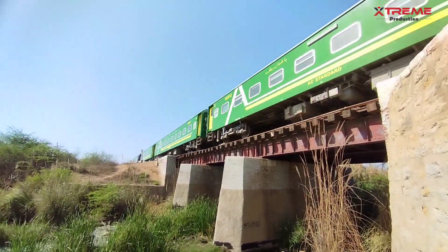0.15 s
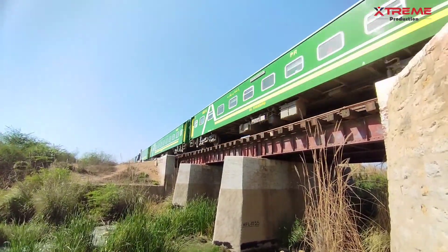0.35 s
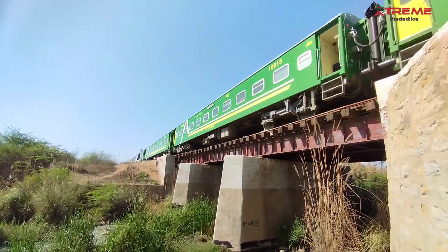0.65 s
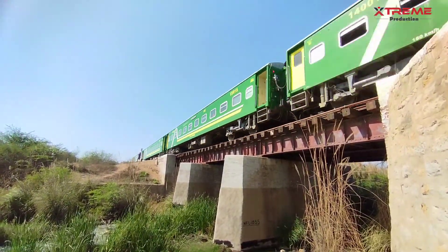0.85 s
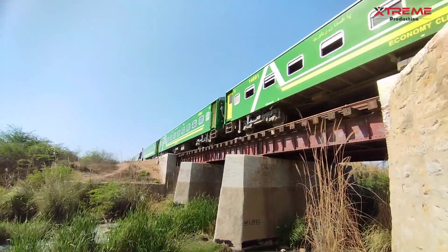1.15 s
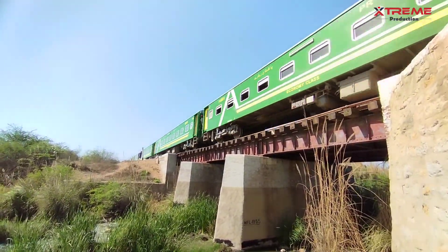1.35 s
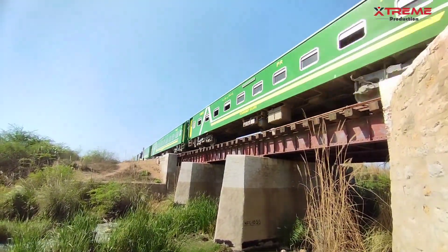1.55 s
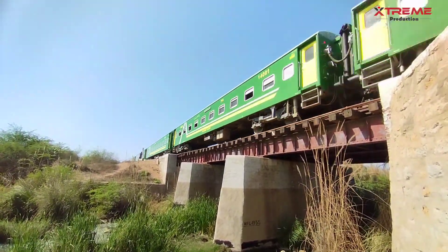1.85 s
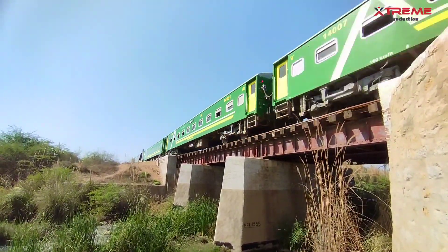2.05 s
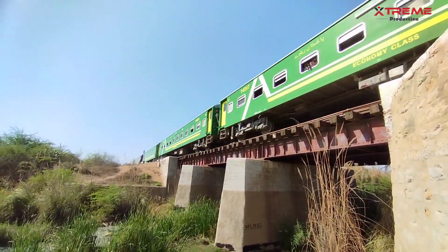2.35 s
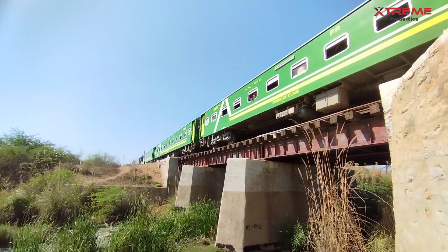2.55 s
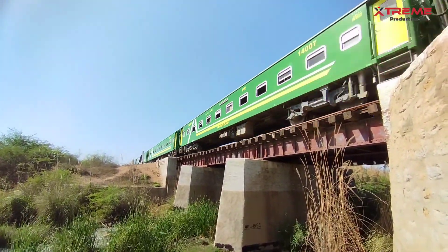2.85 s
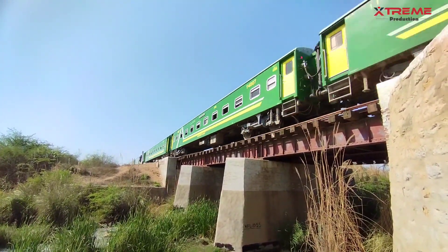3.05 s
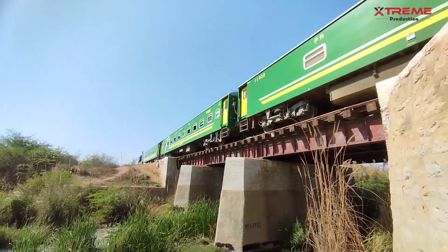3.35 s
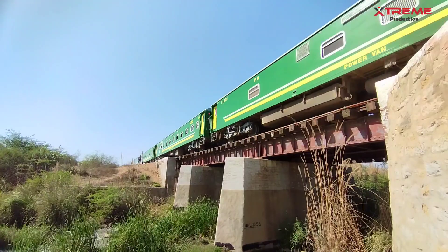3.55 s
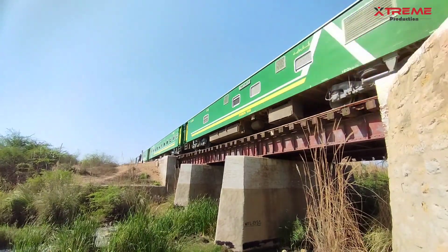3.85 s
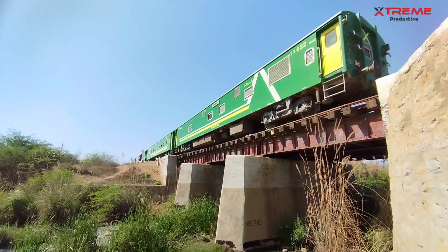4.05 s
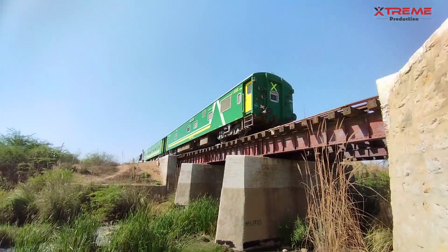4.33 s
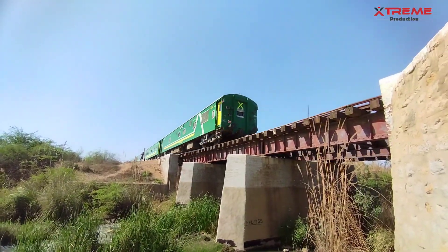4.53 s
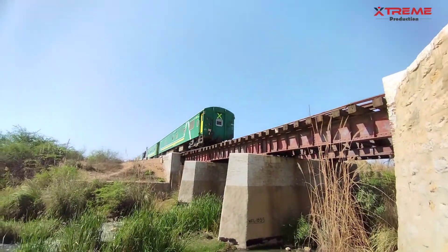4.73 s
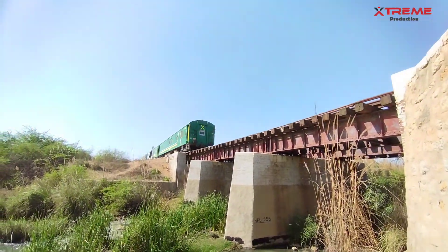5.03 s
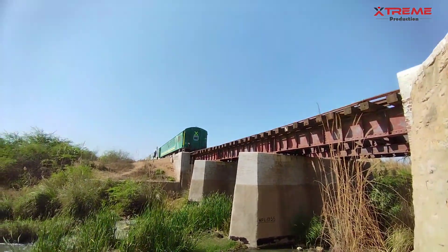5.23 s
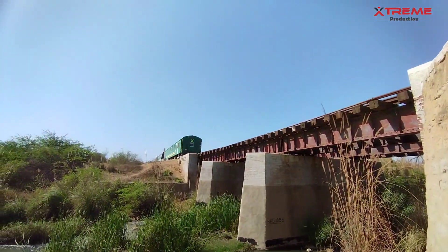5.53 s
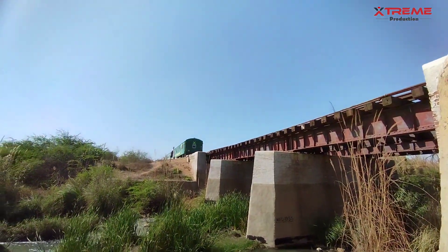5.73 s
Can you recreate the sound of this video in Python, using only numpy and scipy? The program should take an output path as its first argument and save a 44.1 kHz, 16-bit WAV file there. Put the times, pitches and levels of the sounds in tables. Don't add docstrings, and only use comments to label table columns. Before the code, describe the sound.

A passenger train is already crossing a steel girder bridge at full speed, heard outdoors from close below in wide stereo with peaks held down. From 0 to 4.2 s the girder plates give a dense, hollow low roar around a deep span boom, mostly below 450 Hz. About eight or nine knocks a second fall in uneven clusters, the pattern repeating roughly every 1.1 s: dull hard clacks, short wheel-rim pings, chattering loose iron and soft puffs of hiss. Around 4.25 s the wheel noise briefly dips; the last wheels pass at about 4.4-4.6 s with a ringing metallic rush. The train then recedes: the upper plate roar thins while deep throbbing remains. Sparse clanks follow, with a hard cluster near 5.23 s and small sharp clicks at 5.0 and 5.1 s. A faint high rail tone peaks near 5.3 s. Late rattling knocks come at 5.75 and 5.88 s.

```python
import sys
import numpy as np
from scipy import signal
from scipy.fft import rfft, irfft
from scipy.io import wavfile
from scipy.ndimage import uniform_filter1d, minimum_filter1d

SR = 44100
rng = np.random.default_rng(int(sys.argv[2]) if len(sys.argv) > 2 else 0)


def inscribe(sig):
    pcm = np.round(np.clip(np.atleast_2d(sig).T, -1, 1) * 32767)
    wavfile.write(sys.argv[1], SR, pcm.astype(np.int16))


def elevation(decibels):
    levels = np.asarray(decibels, float)
    return 10 ** (levels / 20)


N = 259749
FREQ_HZ = np.fft.rfftfreq(N, 1 / SR)
TIME_S = np.arange(N) / SR

# time_s, level_db
ROLLING = [(0.0, -32.5), (0.77, -35), (1.64, -33), (1.74, -34.5), (1.95, -34.5), (2.21, -33), (2.64, -34),
           (3.08, -33), (3.36, -31.5), (3.9, -34), (4.12, -35), (4.33, -42.5), (4.46, -30.5), (4.86, -37),
           (5.15, -34.5), (5.44, -38), (5.74, -39.5), (5.89, -32.5)]
# freq_hz, density_db_per_hz
PLATE_COLOUR = [(80, -18), (115, -2.5), (135, -7.5), (165, -2), (215, 0), (300, 0.5), (370, 2), (420, -2),
                (460, -10), (560, -11), (730, -40), (1230, -120)]
# freq_hz, density_db_per_hz
SPAN_COLOUR = [(14, -17), (24, -1), (40, -3), (60, 11.5), (78, 10.5), (98, 14), (120, 3.5), (150, 1),
               (200, -49.5)]
# freq_hz, density_db_per_hz
RAIL_COLOUR = [(250, -45), (430, -2.5), (601, -7.5), (835, -5.5), (1190, -16.5), (1500, -20.5),
               (1950, -31.5), (3300, -120)]
# freq_hz, density_db_per_hz
WHEEL_COLOUR = [(710, -1), (1200, -6.5), (1780, -1), (2000, 0.5), (2920, -5.5), (3270, -4.5), (4950, -12),
                (6050, -13.5), (8300, -31), (10800, -58), (18300, -120)]
# freq_hz, density_db_per_hz
GRIT_COLOUR = [(6500, -30), (7600, -2), (8300, -6), (9400, 0), (10400, -2), (11100, -7), (12000, -2),
               (13500, 0), (15000, -2), (15800, -4)]
# time_s, level_db
SINGING_RAIL = [
    (0, -68),
    (4.2, -71),
    (4.6, -55),
    (5.3, -43),
    (5.89, -56),
]
# freq_hz, share_0_to_1
PORT_LIKENESS = [(60, .98), (400, .97), (550, .8), (750, .87), (1100, .6), (1380, .15), (1800, .5),
                 (2400, .33), (2900, .08), (3800, .27), (4800, .08), (15000, .04)]
# freq_hz, level_db
PORT_BALANCE = [(60, 0.4), (400, 0), (800, 2.5), (1450, 4), (2000, 4), (2600, -4), (3200, -8), (4200, -7),
                (5500, -2.5), (8000, -9), (10500, 2.5), (13000, 4.5), (15500, 3)]
# freq_hz, phase_rad
PORT_PHASE = [(60, -0.2), (500, 0.29), (900, 0.05), (1350, 0.6), (1550, 1.5), (1800, 2), (2300, 1.5),
              (2700, -0.5), (3300, -2), (4300, -6), (15000, 27)]
# freq_hz, level_db, t60_s
KNOCK_MODES = [(567, 5, 0.019), (772, -6.5, 0.048), (983, 2.5, 0.014)]
# ratio_to_ping_hz, level_db, t60_s
PING_MODES = [(.93, -7, 0.035), (1, -3, 0.041), (1.06, -9, .03)]
# freq_hz, width_hz, level_db
WHEEL_BANDS = [(1970, 220, 0), (2650, 150, -3), (3450, 380, -5), (4160, 120, -10)]
# time_s, level_db
LAST_BOGIE = [
    (4.25, -50.5),
    (4.4, -37),
    (4.47, -32),
    (4.6, -44),
    (4.68, -48),
    (4.85, -66),
]
# time_s, level_db
SWAY = [(0.0, -11), (0.03, -16.5), (0.72, -22.5), (1.28, -17), (1.39, -35), (1.52, -14), (1.57, -26.5),
        (2.29, -17.5), (2.74, -24.5), (3.35, -18), (3.84, -27.5), (4.2, -21.5), (4.23, -40), (4.3, -19),
        (4.76, -30.5), (4.82, -16.5), (5.15, -18), (5.89, -11.5)]
SWAY_HZ = (41.1, 85.5)
# time_s, plate_roar_db
LOAD = [(0.0, -13.5), (1.71, -14), (1.76, -16.5), (1.8, -15), (2.08, -12.5), (2.13, -20), (2.18, -14),
        (4.18, -12.5), (4.2, -15.5), (4.61, -10), (4.89, -14.5), (5.02, -12.5), (5.22, -17), (5.27, -12.5),
        (5.35, -20), (5.53, -19), (5.56, -25), (5.89, -19.5)]
# after_first_meeting_s, level_db, spread_s
DEEP_SHAKES = [
    (.17, 5, 0.036),
    (.5, 2, 0.038),
    (.8, 2.5, 0.096),
]
# ping_re_knock_db, rattle_t60_s, surge_re_roar_db
COACH = [(-16, 0.42, 2), (-3, .42, -5), (-22, 0.26, -3.5), (-9, 0.17, -6), (-13, 0.39, 2), (-18, 0.11, 0),
         (-14, 0.09, 2), (-15, 0.28, -2.5), (-16, 0.38, -3.5), (-12, 0.27, -2.5), (-13, 0.21, -1),
         (-20, 0.087, -13)]
COACH_PING_HZ = [3250, 2100, 3100, 3200, 2650, 3200, 3100, 3500, 2600, 3150, 2700, 2750]
# start_s, knock_peak_db, rattle_re_knock_db,
# grit_db
COACH_BLOWS = [(0.036, -13.5, -7, -42), (0.069, -26, -7, -55), (0.169, -27, -22, -47),
               (0.279, -16, -5.5, -44), (0.32, -15, -8.5, -42), (0.404, -10, -13.5, -45),
               (0.529, -13, -8, -41), (0.649, -16, -12, -52), (0.799, -6.5, -12, -56),
               (0.923, -8, -9.5, -45), (1.036, -15, -3, -42), (1.066, -14, -9, -44),
               (1.172, -10.5, -8.5, -40), (1.228, -13, -8, -44), (1.309, -32, -19, -47),
               (1.433, -12, -7.5, -40), (1.469, -20, -6, -50), (1.548, -8, -11.5, -41),
               (1.665, -8, -9, -40), (1.803, -22, -11, -49), (1.941, -5.5, -14, -50),
               (2.065, -10.5, -9, -46), (2.187, -10, -6.5, -40), (2.225, -22, -8, -52),
               (2.318, -13.5, -10, -42), (2.36, -31, -9, -52), (2.439, -31, -13, -45),
               (2.572, -15.5, -4.5, -40), (2.608, -12.5, -13, -42), (2.695, -7.5, -11.5, -39),
                (2.803, -9, -9, -40), (2.951, -24, -7, -48), (3.076, -7.5, -16, -51),
                (3.196, -12.5, -20, -50), (3.309, -15.5, -4.5, -43), (3.366, -13.5, -12, -59),
                (3.439, -12.5, -10.5, -44), (3.48, -26, -10, -46), (3.589, -6.5, -28, -47),
                (3.718, -9.5, -10.5, -45), (3.755, -28, -19, -54), (3.813, -6.5, -17, -45),
                (3.924, -11, -7, -39), (4.068, -24, -13, -52)]
# start_s, knock_peak_db, rattle_re_knock_db, grit_db, rattle_t60_s
LEAVING = [(0.004, -17, -4.5, -48, 0.35), (4.007, -24, -1, -41, 0.25), (4.274, -14.5, -11.5, -58, .45),
           (4.374, -15.5, -9, -49, 0.51), (4.432, -9, -14, -42, 0.25), (4.499, -14, -10.5, -47, 0.5),
           (4.589, -7, -12.5, -41, 0.14), (4.73, -32, -14, -47, .15), (4.808, -16, -8, -55, 0.21),
           (4.919, -17.5, -9.5, -57, 0.35), (4.978, -16, -23, -57, 0.31), (5.012, -30, -12, -46, .15),
           (5.104, -14, -8, -52, 0.14), (5.137, -14.5, -8, -44, 0.12), (5.205, -16, -17, -50, .2),
           (5.228, -5, -12.5, -39, 0.13), (5.238, -7.5, -12, -52, .12), (5.249, -16.5, -3.5, -47, 0.26),
           (5.31, -33, -10, -40, .15), (5.735, -18, -6, -42, .16), (5.747, -20.5, 1, -41, 0.18),
           (5.76, -10, -15, -49, 0.086), (5.871, -12, -2.5, -33, .2), (5.884, -6.5, -12, -29, .17)]
# start_s, peak_db
TICKS = [
    (4.419, -47),
    (5.01, -38),
    (5.135, -37),
    (5.743, -41),
    (5.868, -41),
]

FIRST_MEETING_S, COACH_S = 0.28, 1.144
CLEAR_S, CLEARING_S = 4.76, 0.22
LEAVING_PING_DB, LEAVING_PING_HZ, LEAVING_SURGE_DB = -7.5, 2740, -4.5
GRIT_DB, GRIT_PER_DB, CLEAR_GRIT_DB = -56, 0.5, 1.5
LULL_S, LULL_WIDTH_S, LULL_DB = 4.25, 0.13, -6
GUST_S, TICK_S = 0.041, 0.009
SING_HZ, SING_WIDTH_HZ = 3140, 14
HUM_DB, HUM_PER_DB = -29, 1.43
THIN_DB, DEEP_DB, PLATE_DRIFT_DB = -6, -7, 0.86
CLEAR_THIN_DB, CLEAR_DEEP_DB, PLATE_LUMP_DB = -5.5, 3, 0.7
BETWEEN_DB, SURGE_T60_S, SURGE_RISE_S = -1, 0.71, 0.005
SWAY_MODES_DB, BOOM_DB, BOOM_FROM_SWAY = (-7, -1.5), -6.5, 0.53
NUDGE_DB, CLEAR_NUDGE_DB, SLOW_MODE_LUMP_DB = 3.5, 1.2, 1.8
TWIN_GAP_HZ, TWIN_LOUD_S = 10.15, 5.512


def on_log_hz(table):
    hz, value = np.transpose(table)
    return np.interp(np.log(FREQ_HZ + 1), np.log(hz), value)


def curve(table):
    s, value = np.transpose(table)
    return np.interp(TIME_S, s, value)


def unit(x):
    return x / np.sqrt(np.mean(x ** 2))


def coloured(gain):
    real, imaginary = rng.standard_normal((2, 3, len(FREQ_HZ)))
    return unit(irfft((real + 1j * imaginary) * gain, N))


def resonance(hz, width_hz):
    return 1j * FREQ_HZ * width_hz / (hz ** 2 - FREQ_HZ ** 2 + 1j * FREQ_HZ * width_hz)


def walk(rate_hz):
    hold = int(SR / rate_hz)
    steps = np.repeat(rng.standard_normal(N // hold + 1), hold)
    return unit(uniform_filter1d(uniform_filter1d(steps, hold), hold)[:N])


def span_clear():
    return 1 / (1 + np.exp((CLEAR_S - TIME_S) / CLEARING_S))


def joints():
    over = np.array(COACH_BLOWS)
    coach = np.insert(np.array(COACH), 1, COACH_PING_HZ, axis=1)
    meeting = np.take(coach, np.arange(len(over)) - 3, axis=0, mode="wrap")
    away = []
    for start_s, knock_db, rattle_db, grit_db, t60_s in LEAVING:
        away.append((start_s, knock_db, rattle_db, grit_db,
                     rattle_db + LEAVING_PING_DB, LEAVING_PING_HZ, t60_s, LEAVING_SURGE_DB))
    return np.vstack([np.hstack([over, meeting]), away]).T


def blows(peak_db, t60_s, rise_s):
    power = np.zeros(N)
    for start_s, db, fall_s in zip(joints()[0], peak_db, t60_s):
        start = int(start_s * SR)
        near = slice(start, start + SR // 2)
        t = TIME_S[near] - start_s
        swell = 1 - np.exp(-np.maximum(t, 0) / rise_s)
        power[near] += (elevation(db - 60 * t / max(fall_s, 0.03)) * swell) ** 2
    return power


def struck(modes, pitch, peak_db, delay_s, rise_s, spread):
    out = np.zeros((3, N + SR))
    t = TIME_S[:SR // 8]
    chance = rng.standard_normal((len(peak_db), len(modes), 5))
    for start_s, scale, db, draws in zip(joints()[0], pitch, peak_db, chance):
        start = int((start_s + delay_s) * SR)
        for (mode, mode_db, t60_s), draw in zip(modes, draws):
            decay = elevation(db + mode_db + 1.7 * draw[3] - 60 * t / t60_s)
            swell = 1 - np.exp(-t / rise_s)
            hz = mode * scale * (1 + spread * draw[4])
            phase = 3 * draw[:3, None] * np.c_[[0, 1, 1]]
            out[:, start:start + len(t)] += decay * swell * np.sin(2 * np.pi * hz * t + phase)
    return out[:, :N]


def singing_rail():
    tone = elevation(curve(SINGING_RAIL)) * coloured(resonance(SING_HZ, SING_WIDTH_HZ))[0]
    return np.array([tone, -0.8 * tone])


def grit():
    ring_db = curve(ROLLING)
    lull_db = LULL_DB * np.exp(-((TIME_S - LULL_S) / LULL_WIDTH_S) ** 2)
    steady_db = GRIT_DB + GRIT_PER_DB * (ring_db - ring_db.mean()) + CLEAR_GRIT_DB * span_clear() + lull_db
    power = elevation(2 * steady_db)
    gusts = [(*row, GUST_S) for row in joints()[[0, 3]].T]
    ticks = [(*row, TICK_S) for row in TICKS]
    for start_s, db, length_s in gusts + ticks:
        start = int(start_s * SR)
        near = slice(start, start + SR // 2)
        age = (TIME_S[near] - TIME_S[start]) / length_s
        power[near] += (elevation(db - 5.0) * age * 2.83 * np.exp(-age * 1.52 - 0.18 * age ** 2)) ** 2
    return np.sqrt(power) * elevation(0.97 * walk(120)) * coloured(elevation(on_log_hz(GRIT_COLOUR)))


def last_bogie():
    bands = sum(elevation(db) * np.abs(resonance(hz, width_hz)) ** 2 for hz, width_hz, db in WHEEL_BANDS)
    return elevation(curve(LAST_BOGIE)) * coloured(bands)


def wheel_roar():
    colour = elevation(on_log_hz(WHEEL_COLOUR)) / (1 + (FREQ_HZ / 8200) ** 24)
    octave = np.log2(FREQ_HZ / 1200 + 1e-9)
    regions = np.array([np.exp(-((octave - 0.55 * k) / 0.4) ** 2) + 1e-9 for k in range(6)])
    regions = np.sqrt(regions / regions.sum(axis=0))
    roar = np.zeros((3, N))
    for region in regions:
        part = colour * region
        roar += elevation(1.04 * walk(14)) * np.linalg.norm(part) * coloured(part)
    return unit(roar)


def running_gear():
    _, knock_db, rattle_db, _, ping_db, ping_hz, t60_s, _ = joints()
    ring_db = curve(ROLLING) + 1.21
    hum_db = HUM_DB + HUM_PER_DB * (ring_db - ring_db.mean())
    chatter = walk(70)
    rail_power = elevation(2 * hum_db) + blows(knock_db - 9.5, 1.64 * t60_s, rise_s=0.0093)
    rattle = blows(knock_db + rattle_db - 4.5, 1.51 * t60_s, rise_s=0.0076)
    wheel_power = elevation(2 * ring_db) + uniform_filter1d(rattle, size=700)
    rail = np.sqrt(rail_power) * elevation(0.75 * chatter) * coloured(elevation(on_log_hz(RAIL_COLOUR)))
    wheels = np.sqrt(wheel_power) * elevation(0.5 * chatter + 0.5 * walk(150)) * wheel_roar()
    knocks = struck(KNOCK_MODES, np.ones_like(t60_s), knock_db - 2.0,
                    delay_s=0, rise_s=0.0015, spread=0.045)
    pings = struck(PING_MODES, ping_hz, knock_db + ping_db + 0.5,
                   delay_s=0.006, rise_s=0.0032, spread=0.013)
    return rail + wheels + knocks + pings


def span_bending(load_db, clear):
    sway_db = curve(SWAY)
    boom_db = BOOM_DB + BOOM_FROM_SWAY * sway_db + (1 - BOOM_FROM_SWAY) * load_db
    sound = elevation(boom_db) * coloured(elevation(on_log_hz(SPAN_COLOUR)))
    nudge_db = NUDGE_DB + (CLEAR_NUDGE_DB - NUDGE_DB) * clear
    lumps = elevation(SLOW_MODE_LUMP_DB * walk(22))
    throb = np.cos(np.pi * TWIN_GAP_HZ * (TIME_S - TWIN_LOUD_S))
    for hz, db, beat in zip(SWAY_HZ, SWAY_MODES_DB, (lumps, throb)):
        level = np.sqrt(2) * elevation(sway_db + db + nudge_db * walk(14)) * beat
        phase = 0.3 * nudge_db * walk(11)
        sound[0] += level * np.sin(2 * np.pi * hz * TIME_S + phase)
    return sound


def girder_plates(load_db, clear):
    start_s, *_, surge_db = joints()
    surges = blows(surge_db, np.full(len(start_s), SURGE_T60_S), rise_s=SURGE_RISE_S)
    roar = elevation(load_db + PLATE_LUMP_DB * walk(25.1)) * np.sqrt(elevation(2 * BETWEEN_DB) + surges)
    in_coach_s = (TIME_S - FIRST_MEETING_S) % COACH_S
    shake_db = sum(db * np.exp(-((in_coach_s - at_s) / spread_s) ** 2) for at_s, db, spread_s in DEEP_SHAKES)
    thin_db = THIN_DB + CLEAR_THIN_DB * clear + PLATE_DRIFT_DB * walk(8)
    deep_db = DEEP_DB + shake_db + CLEAR_DEEP_DB * clear + PLATE_DRIFT_DB * walk(8.6)
    modes_hz = np.geomspace(130, 480, num=26) * (1 + 0.02 * rng.standard_normal(26))
    modes = sum(resonance(hz, 0.053 * hz) * (-1) ** k for k, hz in enumerate(modes_hz))
    colour = elevation(on_log_hz(PLATE_COLOUR)) * (0.68 + np.abs(modes))
    thin_share = 1 / (1 + (310 / (FREQ_HZ + 1)) ** 12)
    deep_share = 1 / (1 + (FREQ_HZ / 195) ** 12)
    middle_share = np.clip(1 - thin_share - deep_share, 0, 1)
    plates = elevation(-1.5) * coloured(colour * np.sqrt(middle_share))
    plates += elevation(thin_db) * coloured(colour * np.sqrt(thin_share))
    plates += elevation(deep_db) * coloured(colour * np.sqrt(deep_share))
    return roar * plates


def girders():
    load_db, clear = curve(LOAD), span_clear()
    return span_bending(load_db, clear) + girder_plates(load_db, clear)


def ports(sound):
    shared, left, right = rfft(sound)
    alike = np.clip(on_log_hz(PORT_LIKENESS), 0, 1)
    late = np.exp(-0.5j * on_log_hz(PORT_PHASE))
    tilt = elevation(on_log_hz(PORT_BALANCE) / 2)
    boost = np.sqrt(2 / (1 + alike))
    left_port = tilt * (np.sqrt(alike) * shared * late + np.sqrt(1 - alike) * left)
    right_port = (np.sqrt(alike) * shared / late + np.sqrt(1 - alike) * right) / tilt
    return irfft(boost * np.array([left_port, right_port]), N)


def scene():
    return singing_rail() + ports(grit() + last_bogie() + running_gear() + girders())


def roll_off(x):
    return signal.sosfilt(signal.butter(12, 15830, fs=SR, output="sos"), x)


def record(dry):
    peak = np.max(np.abs(dry), axis=0)
    gain = minimum_filter1d(np.minimum(1, 0.92 / (peak + 1e-9)), size=301)
    mix = dry * uniform_filter1d(gain, size=301)
    return roll_off(mix)


dry = scene()
out = record(dry)
inscribe(out)
```